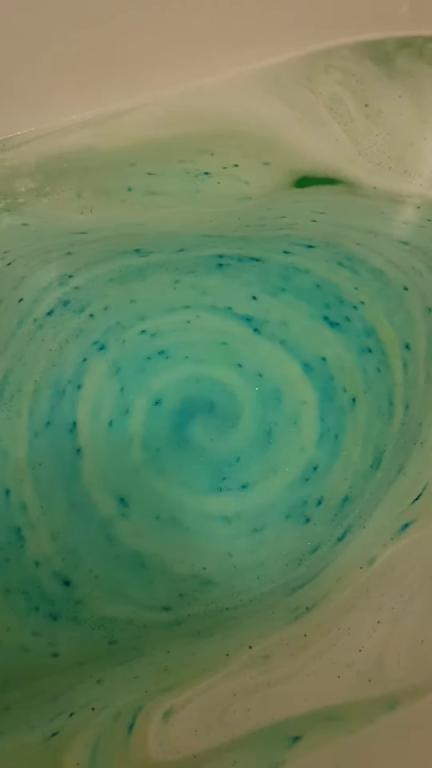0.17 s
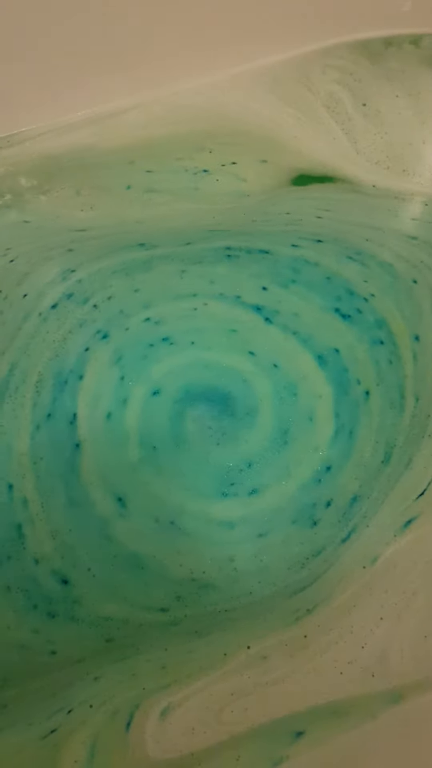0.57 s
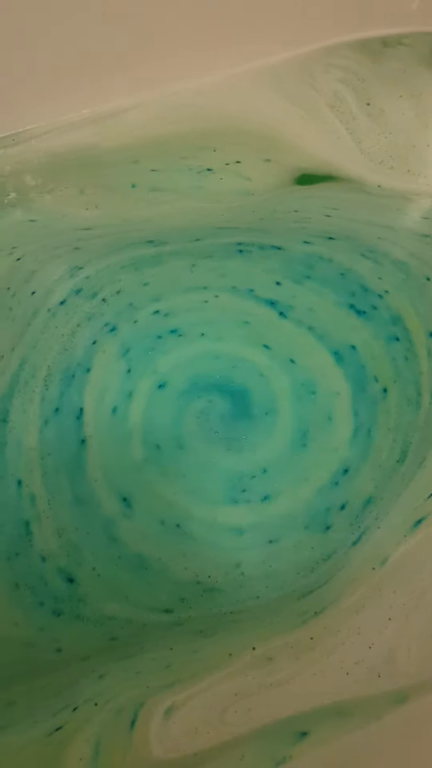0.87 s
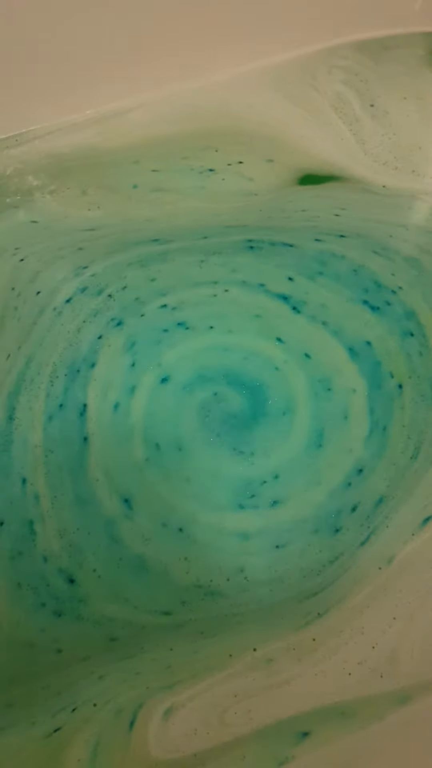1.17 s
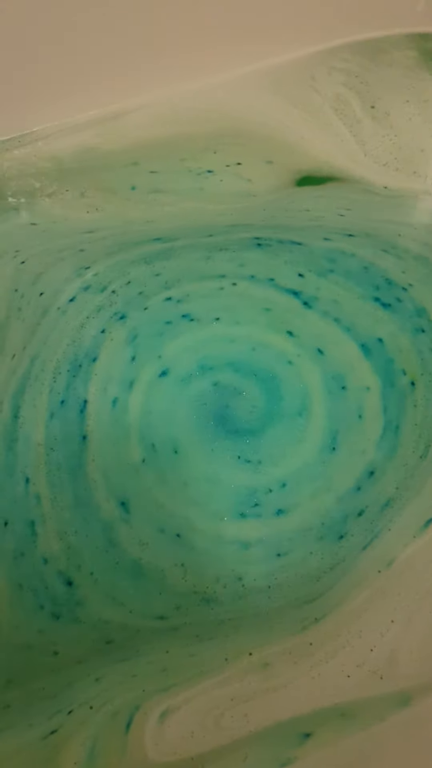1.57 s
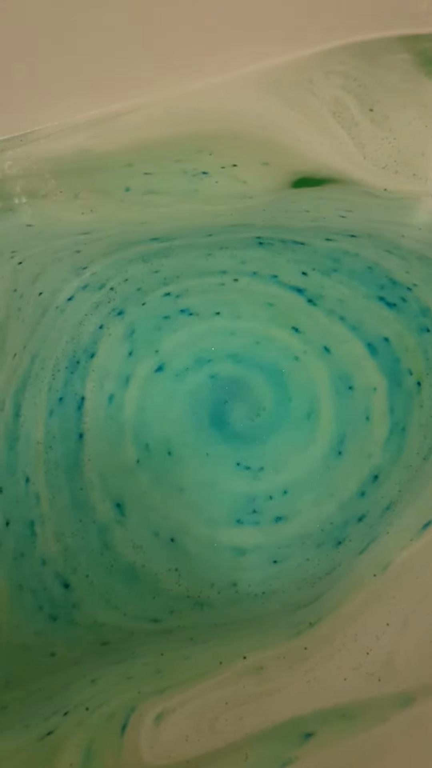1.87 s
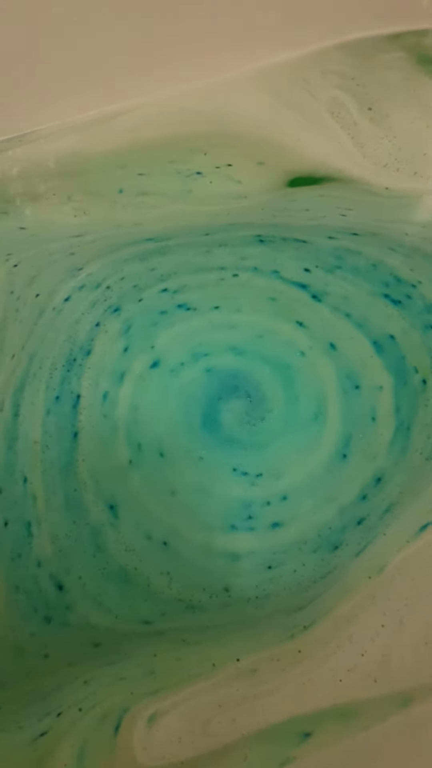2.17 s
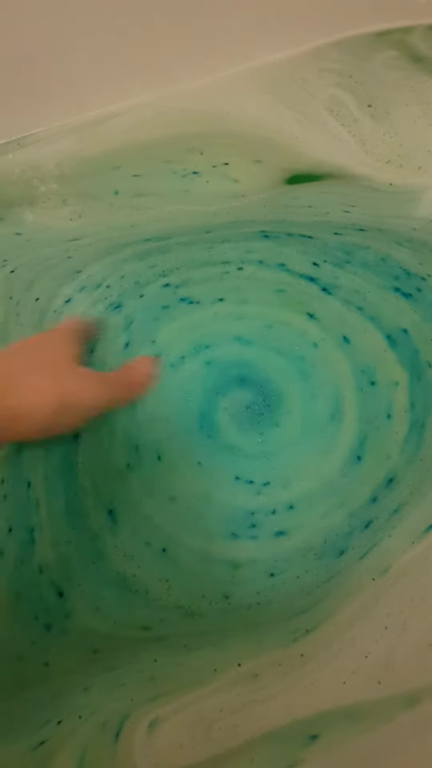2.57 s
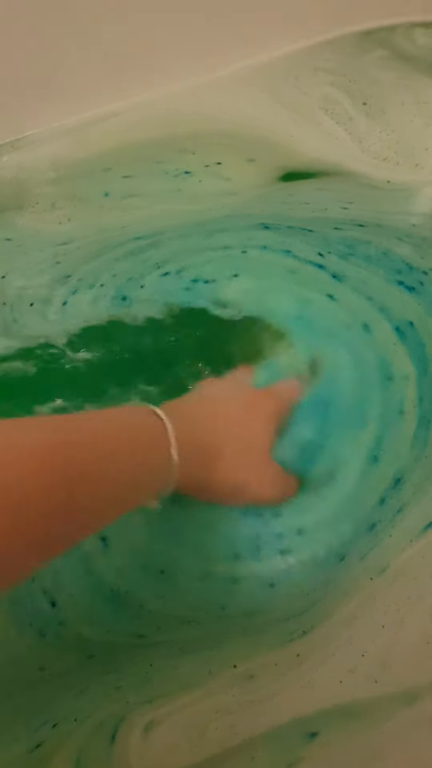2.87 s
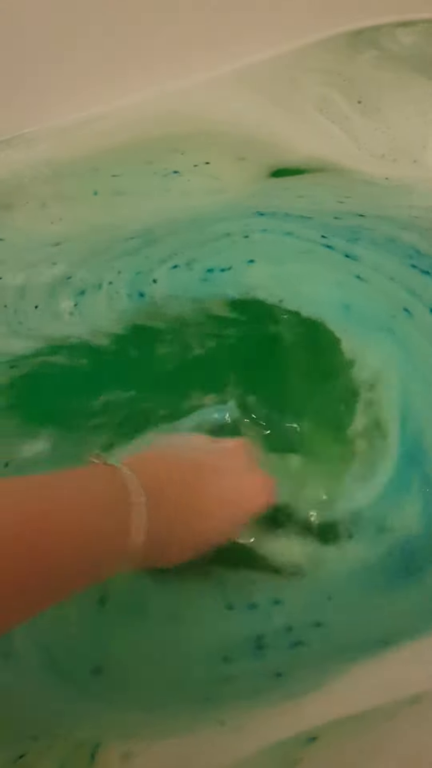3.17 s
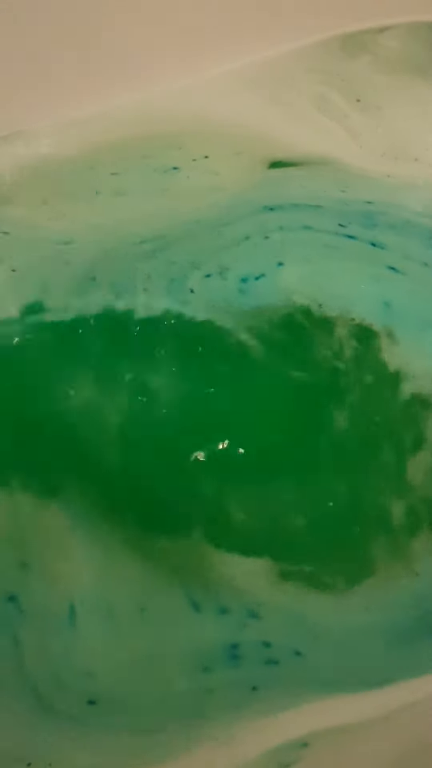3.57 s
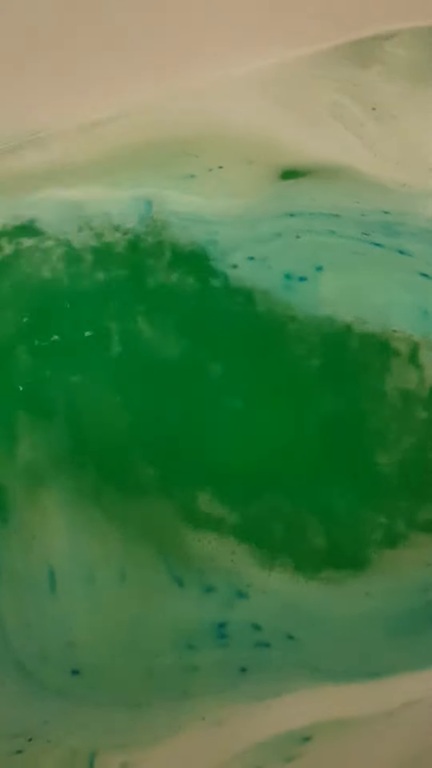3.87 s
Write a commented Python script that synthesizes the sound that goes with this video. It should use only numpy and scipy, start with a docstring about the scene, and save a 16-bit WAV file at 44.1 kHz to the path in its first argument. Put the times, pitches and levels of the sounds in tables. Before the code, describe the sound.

Bath water gurgles and slaps when a hand stirs it, coming late after a quiet room with low drone and microphone hiss; the close, bright splash rings off the tub walls and continues to the end.

```python
"""A hand sweeps under the water of a foamy bath and is pulled out with a splash.
Each water slap is a burst of noise, and each trapped bubble is a fading tone that climbs in pitch.
Swarms of random bubbles make the gurgle and spray, and tiny random ticks make the mist and foam fizz.
The tub walls and the room echo the splash. Filtered noise makes the hand's dull rumble,
the low drone of a small bathroom and the hiss of the microphone."""
import sys
import numpy as np
from scipy import signal
from scipy.fft import rfft, irfft
from scipy.io import wavfile

SR = 44100
rng = np.random.default_rng(int(sys.argv[2]) if len(sys.argv) > 2 else 0)


def store_pcm(level_fs):
    """Save levels as 16-bit WAV."""
    pcm = np.round(np.clip(level_fs, -1, 1) * 32767).astype(np.int16)
    wavfile.write(sys.argv[1], SR, np.atleast_2d(pcm).T)


N = 176400  # length in samples: four seconds

# The room's low drone. Each row: frequency in Hz, relative level in dB.
DRONE_COLOUR = [(19, -44), (32, -7), (54, -9.5), (73, -7), (91, -4), (119, -10), (265, -10.5), (314, -13.5),
                (415, -13.5), (728, -30.5), (1600, -24), (1750, -29.5), (2800, -34.5), (3640, -53)]
# Resonances in the drone. Each row: frequency in Hz, width in Hz, relative level in dB.
DRONE_RESONANCES = [(266.3, 81, -68.5), (933, 23, -88), (1624, 26, -82.5)]
# How the drone rises and sinks. Each row: time in seconds, level change in dB.
DRONE_SWELL = [(0, -1), (.85, -1), (1.03, -5), (1.42, 0), (1.55, -1.5), (1.75, 2), (2.3, -2), (2.9, -.5),
               (4.0, 2.5)]
# Microphone hiss. Each row: frequency in Hz, relative level in dB.
HISS_COLOUR = [(1470, -27), (2500, -25), (3800, -11.5), (4420, -6.5), (4840, -3), (7110, -3), (8170, -7.5),
               (12300, -.5), (15700, -1)]

# Faint fizz of the foam. Each row: time in seconds, relative level in dB.
FIZZ_LEVEL = [(0, -72.5), (.25, -68.5), (.9, -72.5), (1.4, -71.5), (1.7, -81), (1.82, -71), (1.95, -107),
              (2.5, -84), (2.75, -76)]
# Tone of the fizz. Each row: frequency in Hz, relative level in dB.
FIZZ_COLOUR = [(1900, -15), (2700, -11), (3600, -5), (4500, -5.5), (6500, -14.5), (9000, -22)]
# Soft crackles and swishes in the foam. Each row: start in seconds, relative level in dB,
# centre in Hz, filter width in Hz, fade time of the noise in seconds.
FOAM_RUSTLES = [(.235, -53, 4200, 1800, 0.0095), (.438, -54, 4060, 2000, .006),
                (1.762, -50, 4340, 3470, .007), (1.785, -59, 4540, 3000, 0.02),
                (2.531, -48, 12800, 9000, 0.013), (2.96, -58, 12900, 6960, 0.19),
                (2.692, -55, 3430, 1700, 0.045)]

# Air resonances between the tub walls. Each row: frequency in Hz, gain in dB,
# left-over-right level difference in dB.
TUB_MODES = [(540, 9.5, 8), (684.5, 9, 10), (729, 0, 21.5), (822, 1.5, 16), (1150, 0.5, 3),
             (1501, 5.5, -13), (2130, 2, -7), (2200, 2, 1), (2725, 4, -5)]
# Echoes off the tub walls. Each row: left delay in seconds, right delay in seconds, level in dB.
TUB_ECHOES = [(.0017, 0.0027, -18), (.0041, .0033, -13), (.0066, .0058, -11.5), (0.012, 0.014, -8)]

# The hand's push under water. Each row: time in seconds, level in dB.
SWEEP_LEVEL = [(2.95, -85), (3.06, -61.5), (3.12, -52.5), (3.2, -58.5), (3.3, -68.5), (3.5, -69),
               (3.65, -62.5), (4.0, -65)]
# Tone of the push. Each row: frequency in Hz, relative level in dB.
SWEEP_COLOUR = [(50, -20), (95, 12), (150, -1), (220, 5), (400, 2), (650, -12), (900, -27), (3000, -72)]

# Churned water. Each row: time in seconds, then the relative levels in dB
# of the gurgle, of the small bubbles and of the spray.
CHURN = [(3.28, -88, -95, -84), (3.335, -65, -56, -62), (3.37, -58.5, -53, -59.5), (3.42, -48, -45, -57),
         (3.47, -37, -40, -55), (3.525, -41.5, -46, -48.5), (3.56, -33.5, -27.5, -50.5),
         (3.595, -40, -39.5, -50.5), (3.66, -31.5, -37.5, -49.5), (3.72, -41.5, -41.5, -52.5),
         (3.785, -39.5, -37.5, -53), (3.82, -47, -40.5, -52), (3.89, -40.5, -39.5, -58),
         (3.925, -52, -45.5, -53.5), (3.965, -42, -38.5, -51.5), (4.0, -60, -46, -55)]
# Tones of gurgle, spray and mist. Each row: frequency in Hz, relative level in dB.
GURGLE_COLOUR = [(380, -12), (560, -8.5), (750, -1.5), (1000, 3.5), (1300, 3.5), (1600, 7.5), (2200, -14)]
SPRAY_COLOUR = [(1500, -25), (3500, 3.5), (5000, 3), (7000, 2.5), (8300, -4), (11000, -15)]
MIST_COLOUR = [(4000, 0), (7000, -1.5), (8500, -4), (11000, 1.5), (16000, -4.5)]
# Slaps of water on water. Each row: start in seconds, relative level in dB,
# centre in Hz, filter width in Hz, fade time of the noise in seconds.
SLAPS = [(3.2945, -41.5, 6080, 1490, 0.0028), (3.299, -46, 1590, 690, .0034),
         (3.310, -47.5, 2570, 1200, 0.0081), (3.3433, -33, 4800, 6200, 0.0011),
         (3.385, -53, 3000, 5000, 0.0036), (3.4715, -26.5, 2900, 2330, 0.0039),
         (3.5382, -19, 4730, 3200, 0.0027), (3.5594, -24.5, 2770, 2000, .0022),
         (3.617, -31, 6470, 1200, .0027), (3.6392, -18, 1500, 1800, 0.0011),
         (3.7335, -34.5, 10300, 9700, 0.011), (3.765, -27.5, 2620, 2460, 0.0051),
         (3.802, -28, 5160, 2960, 0.008), (3.814, -42, 4600, 4000, .0074), (3.839, -27, 2870, 2000, 0.0023),
         (3.9424, -28.5, 3950, 3880, .0025), (3.963, -45, 10000, 9200, 0.013)]
# Single bubbles. Each row: start in seconds, starting pitch in Hz, relative level in dB,
# cycles until 60 dB down, extra delay on the right in milliseconds (below zero: right is first).
BUBBLES = [(2.699, 1320, -52.5, 57, 0.2), (2.751, 2080, -49, 70, 0.16), (2.763, 2190, -59, 58, .05),
           (3.343, 1920, -25.5, 16.5, 0.093), (3.386, 2190, -30.5, 17, 0.079), (3.400, 1520, -33, 24, 0.17),
           (3.427, 2500, -31, 33, 0), (3.444, 2680, -28.5, 33, 0.067), (3.4529, 1790, -29, 13, -0.11),
           (3.4726, 1520, -24.5, 7.5, 0.17), (3.478, 820, -48, 29, 0.27), (3.505, 2126, -36, 88, 0.025),
           (3.509, 470, -42, 26, 0.24), (3.5391, 1214, -19, 29, 0.21), (3.555, 2657, -22.5, 70, 0.052),
           (3.558, 2160, -32, 60, 0.11), (3.561, 1210, -33, 21, 0.45), (3.579, 1110, -34, 19, -0.002),
           (3.583, 2600, -30, 41, -0.041), (3.600, 735, -30.5, 14, -0.02), (3.602, 1205, -20.5, 50, 0.16),
           (3.6108, 1406, -23.5, 31, .47), (3.6362, 1060, -15.5, 24, -0.12), (3.638, 763, -26, 28, 0.29),
           (3.6385, 537, -37.5, 32, -0.038), (3.639, 2160, -23, 64, 0.049), (3.6424, 1308, -20.5, 52, 0.26),
           (3.701, 1490, -25.5, 26, 0.16), (3.737, 1590, -30, 59, 0.022), (3.764, 1070, -26.5, 30, .2),
           (3.802, 1500, -30, 19, 0.24), (3.811, 1790, -33, 30, -0.07), (3.818, 1370, -20.5, 26, 0.19),
           (3.851, 1100, -24.5, 20, 0.24), (3.875, 875, -24.5, 7, 0.15), (3.902, 680, -39, 41, 0.17),
           (3.924, 4270, -26, 66, 0.049), (3.9426, 2310, -14.5, 11.5, -0.098), (3.969, 1230, -31, 31, 0.26),
           (3.982, 4310, -31.5, 153, -0.0034)]

DRONE_DB, DRONE_SIDE_DB = -64, -4  # relative level; share that differs left from right
BOOM_HZ, BOOM_WIDTH_HZ, BOOM_DB = 90.1, 19, -62.5  # the room's lowest resonance
HISS_DB = -61.5
# Left-over-right level differences in dB
DRONE_PAN_DB, BOOM_PAN_DB, HISS_PAN_DB = 0.55, 3, 6
WATER_PAN_DB, TREBLE_PAN_DB = 2, 6

ROOM_DB, ROOM_T60_S = -6, 0.38  # T60 is the time to fade by 60 dB
TUB_T60_S = 0.31
MIST_DB = 0.5  # relative to the spray
CLUSTER_HZ = 44.6  # new random spray levels per second
RISE = 0.23  # share by which a bubble's pitch climbs over its life
BUBBLE_ATTACK_CYCLES = 0.48
TOP_HZ = 15850  # treble limit


def undb(db):
    """Turn decibels into gain."""
    return 10 ** (np.asarray(db) / 20)


def unit(x):
    """Scale to an average strength (rms) of 1."""
    return x / np.sqrt(np.mean(x ** 2) + 1e-30)


def pan(db):
    """Left and right gains for a level difference; above zero the left is louder."""
    return undb(np.array([[db], [-db]]) / 2)


def curve(table, column):
    """Gain over time from a table of levels, practically silent before its first row."""
    rows = np.array(table)
    t = np.arange(N) / SR
    return undb(np.interp(t, rows[:, 0], rows[:, column], left=-150))


def colour(x, points):
    """Shape the tone by (Hz, dB) points, falling steeply beyond their ends."""
    hz, db = np.array(points).T
    log_hz = np.log(hz)
    f = np.log(np.maximum(np.fft.rfftfreq(N, 1 / SR), 1))
    outside = np.abs(f - np.clip(f, log_hz[0], log_hz[-1]))
    gain = undb(np.interp(f, log_hz, db) - 60 * outside)
    return irfft(rfft(x) * gain, N)


def band(x, hz, width):
    """Keep the sound near one frequency with a resonance applied twice."""
    hz = min(hz, SR / 2 - 2000)
    b, a = signal.iirpeak(hz, hz / min(width, SR / 3), fs=SR)
    once = signal.lfilter(b, a, x)
    return signal.lfilter(b, a, once)


def add(out, start, sound):
    """Mix a sound in at a time in seconds."""
    i = int(start * SR)
    part = sound[..., :max(N - i, 0)]
    out[..., i:i + part.shape[-1]] += part


def background():
    """Filtered noise makes the room's low drone with a few resonances, and microphone hiss."""
    air = unit(colour(rng.standard_normal((2, N)), DRONE_COLOUR)) * undb(DRONE_DB)
    for hz, width, db in DRONE_RESONANCES:
        air = air + unit(band(rng.standard_normal((2, N)), hz, width)) * undb(db)
    # One noise is shared; the other has opposite signs left and right, for breadth
    side = undb(DRONE_SIDE_DB) * air[1] * np.array([[1], [-1]])
    drone = (air[0] + side) * pan(DRONE_PAN_DB)
    boom = unit(band(rng.standard_normal(N), BOOM_HZ, BOOM_WIDTH_HZ)) * undb(BOOM_DB)
    low = drone + boom * pan(BOOM_PAN_DB)
    hiss = unit(colour(rng.standard_normal((2, N)), HISS_COLOUR)) * undb(HISS_DB)
    return low * curve(DRONE_SWELL, 1) + hiss * pan(HISS_PAN_DB)


def tub_ring(x):
    """The air in the tub rings on at its own pitches."""
    out = 0
    for hz, db, pan_db in TUB_MODES:
        sharpness = np.pi * hz * TUB_T60_S / np.log(1000)  # makes the ring last TUB_T60_S
        b, a = signal.iirpeak(hz, sharpness, fs=SR)
        out = out + signal.lfilter(b, a, x) * undb(db) * pan(pan_db)
    return out


def bathroom(x):
    """Direct sound, the tub's ring and echoes, and a fading noise tail for the room."""
    out = x + tub_ring(x)
    for left_s, right_s, db in TUB_ECHOES:
        add(out[0], left_s, undb(db) * x[0])
        add(out[1], right_s, undb(db) * x[1])
    t = np.arange(SR // 2) / SR
    fade = undb(-60 * t / ROOM_T60_S) * (1 - np.exp(-t / .008))  # soft start, then dying away
    tail = rng.standard_normal((2, len(t))) * fade
    tail = signal.sosfilt(signal.butter(1, 7000, fs=SR, output="sos"), tail)
    tail = undb(ROOM_DB) * unit(tail) / np.sqrt(len(t))
    return out + signal.fftconvolve(x, tail, axes=1)[:, :N]


def fizz():
    """Foam cells burst as random pops, placed separately left and right."""
    pops = rng.standard_normal((2, N)) * (rng.random((2, N)) < .03)
    return unit(colour(pops, FIZZ_COLOUR)) * curve(FIZZ_LEVEL, 1) * pan(TREBLE_PAN_DB)


def bursts(table):
    """Each slap, crackle or swish is a burst of noise that dies away, quickly or slowly."""
    out = np.zeros((2, N))
    t = np.arange(SR // 2) / SR
    for start, db, hz, width, decay in table:
        noise = rng.standard_normal((3, len(t)))
        fade = np.exp(-t / decay)
        # The first noise is shared; the others differ left and right
        burst = band((noise[0] + noise[1:]) * fade, hz, width)
        strength = np.sqrt(np.mean(fade ** 2)) * undb(db) / 2
        add(out, start, unit(burst) * strength)
    return out


def sweep():
    """The submerged hand stirs up a dull rumble, made of low noise."""
    noise = rng.standard_normal((3, N))
    rumble = colour(noise[0] + 0.54 * noise[1:], SWEEP_COLOUR)
    return unit(rumble) * curve(SWEEP_LEVEL, 1)


def mist():
    """The finest droplets tick on the foam at random strengths; rms 1."""
    hits = rng.random(N) < .04  # the same moments left and right
    boost = undb(0.9 * np.minimum(rng.exponential(size=N), 5))
    ticks = rng.standard_normal((2, N)) * hits * boost
    return unit(colour(ticks, MIST_COLOUR))


def clusters(depth_db):
    """Water falls in handfuls: a gain that wanders many times a second, rms 1."""
    t = np.arange(N) / SR
    steps = rng.uniform(-1, 1, N // 100)
    wander = np.interp(t * CLUSTER_HZ, np.arange(len(steps)), steps)
    return unit(undb(depth_db * wander))


def bubble(hz, cycles):
    """A pocket of air rings, dies away and climbs in pitch as it nears the surface."""
    turns = np.arange(int(cycles / hz * SR) + 2) * hz / SR
    life = turns / cycles  # 0 at birth, 1 at the end
    tone = np.sin(2 * np.pi * turns * (1 + RISE * life / 2))
    attack = 1 - np.exp(-turns / BUBBLE_ATTACK_CYCLES)
    return tone * np.exp(-np.log(1000) * life) * attack


def swarm(low_hz, high_hz, cycles, scatter_db, count):
    """Many bubbles of random pitch, loudness, length and place; rms 1 during the splash."""
    out = np.zeros((2, N))
    start, end = CHURN[0][0], N / SR
    for k, (when, pitch, size, life, place, lag) in enumerate(rng.random((count, 6))):
        t = start + (end - start) * (k + when) / count
        hz = low_hz * (high_hz / low_hz) ** pitch
        ring = bubble(hz, cycles * (.5 + life)) * undb(-scatter_db * size)
        left, right = pan(8 * (place - .5))[:, 0]
        add(out[0], t, left * ring)
        add(out[1], t + .0004 * (lag - .5), right * ring)
    return unit(out) * np.sqrt((end - start) / end)


def single_bubbles():
    """Single air pockets, large and small, ring at set moments, often overlapping."""
    out = np.zeros((2, N))
    for start, hz, db, cycles, lag_ms in BUBBLES:
        ring = undb(db) * bubble(hz, cycles)
        add(out[0], start, ring)
        add(out[1], start + lag_ms / 1000, ring)
    return out


def splash():
    """Single bubbles and slaps stand out of gurgle, small bubbles, spray and mist."""
    low = swarm(low_hz=419.6, high_hz=1538, cycles=16.8, scatter_db=17.5, count=270)
    gurgle = colour(low, GURGLE_COLOUR) * curve(CHURN, 1) * undb(-6.5)
    small = swarm(low_hz=1662, high_hz=3727, cycles=52, scatter_db=16.5, count=330)
    small = small * curve(CHURN, 2) * undb(-4.5)
    drops = swarm(low_hz=3673, high_hz=8340, cycles=73, scatter_db=29, count=520)
    spray = colour(drops, SPRAY_COLOUR) + mist() * undb(MIST_DB)
    spray = spray * curve(CHURN, 3) * clusters(depth_db=3.5)
    water = (single_bubbles() + gurgle + small) * pan(WATER_PAN_DB)
    return water + (spray + bursts(SLAPS)) * pan(TREBLE_PAN_DB)


def scene():
    """Foam rustles and splash echo in the bathroom, over rumble, fizz and background."""
    rustles = bursts(FOAM_RUSTLES) * pan(TREBLE_PAN_DB)
    return background() + fizz() + sweep() + bathroom(rustles + splash())


def record(dry):
    """The recorder sharply cuts the treble above TOP_HZ."""
    return signal.sosfilt(signal.ellip(14, .1, 80, TOP_HZ, fs=SR, output="sos"), dry)


dry = scene()
out = record(dry)
store_pcm(out)
```